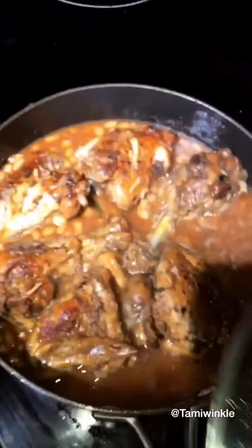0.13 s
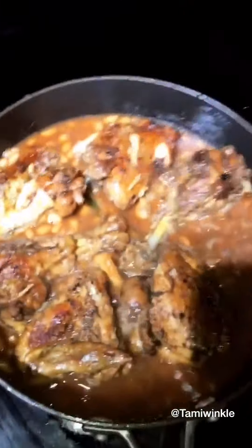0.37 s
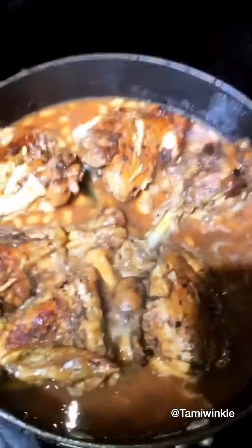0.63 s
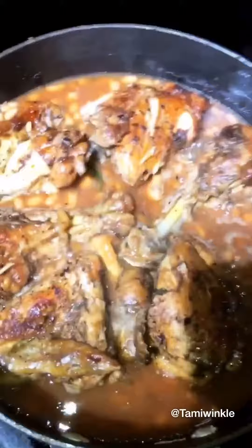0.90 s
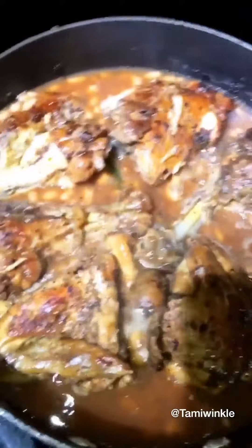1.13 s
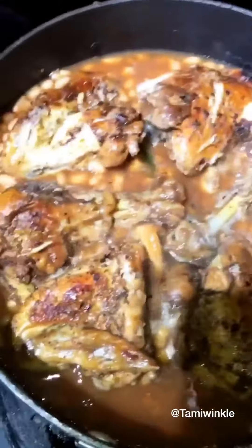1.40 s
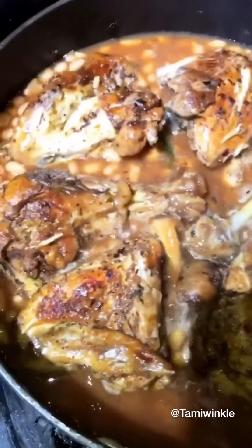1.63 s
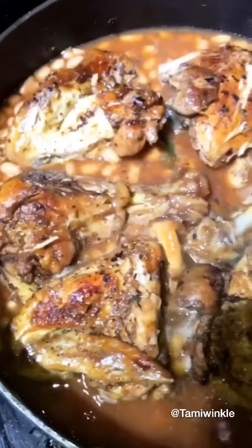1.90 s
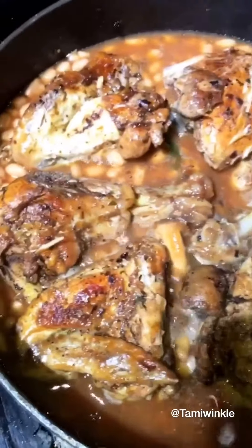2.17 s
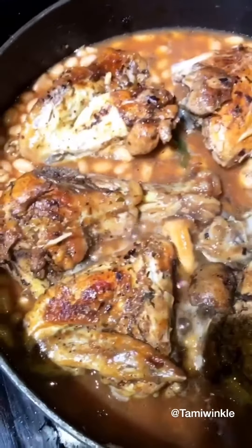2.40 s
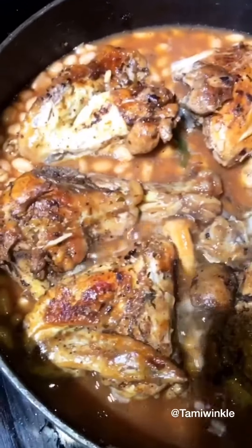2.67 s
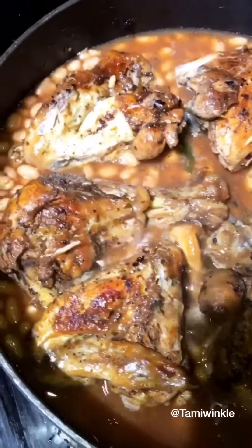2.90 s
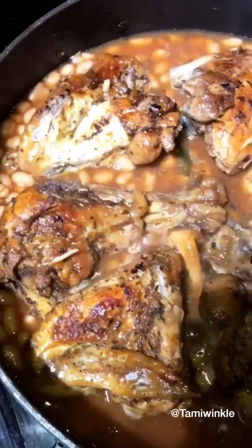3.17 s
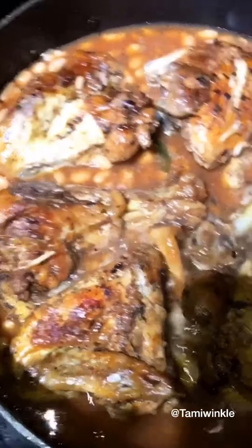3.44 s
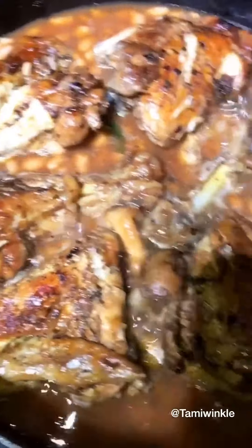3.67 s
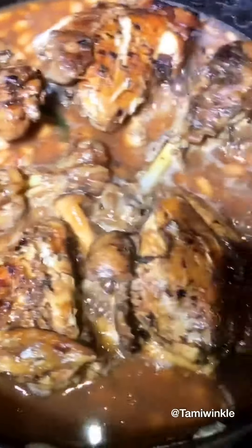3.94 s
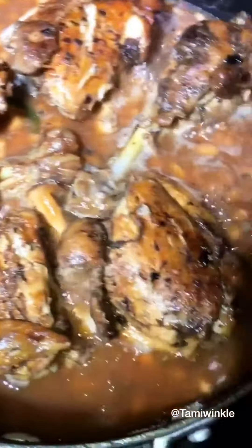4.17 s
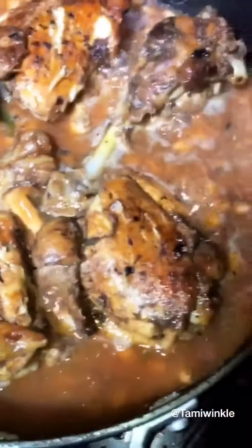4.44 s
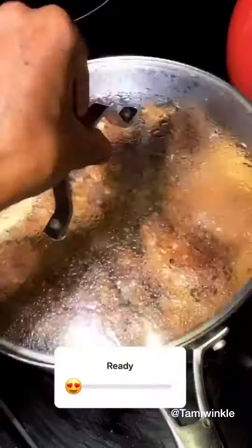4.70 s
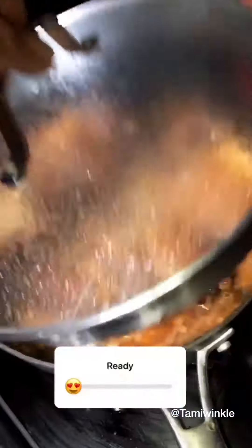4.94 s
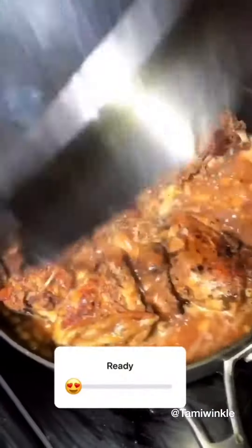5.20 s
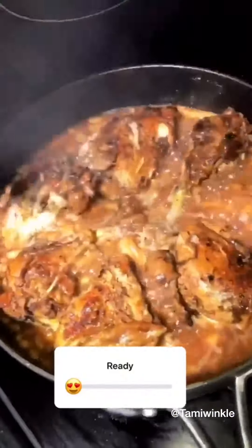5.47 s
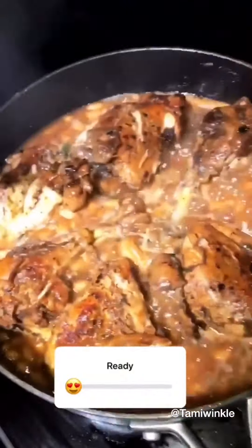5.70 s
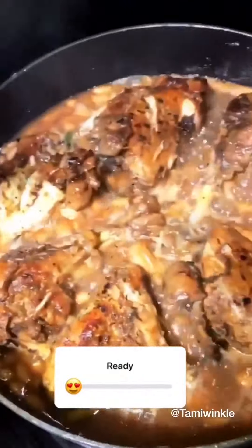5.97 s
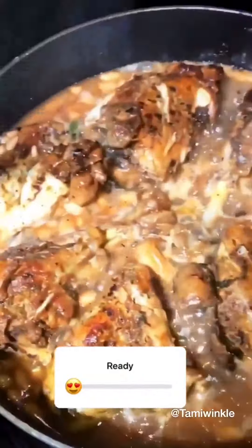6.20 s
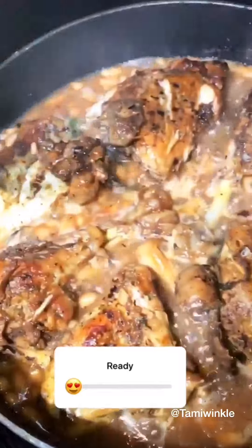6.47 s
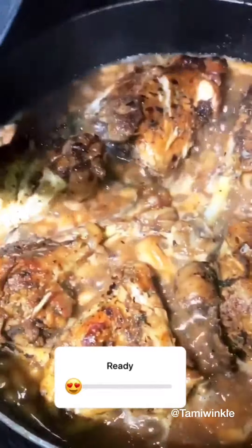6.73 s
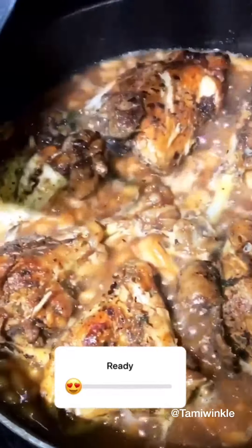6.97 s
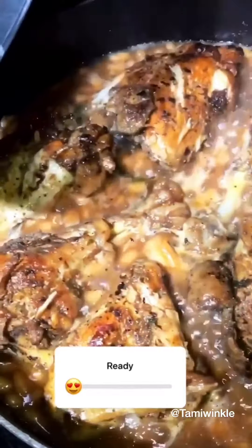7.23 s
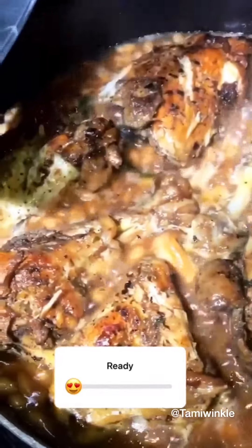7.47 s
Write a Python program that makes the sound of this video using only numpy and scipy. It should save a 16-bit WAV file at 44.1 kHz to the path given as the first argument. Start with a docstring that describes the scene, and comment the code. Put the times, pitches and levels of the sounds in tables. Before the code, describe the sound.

Thick sauce around chicken pieces simmers in a steel skillet, close to the microphone in a small, slightly reverberant kitchen. From 0 s, steam bubbles burst irregularly with hollow mid-pitched plops, smaller wet snaps and gurgles, over a fine soft fizz, crackle and low room rumble. At 0.96 s a lid lands nearby with two or three firm, damped knocks, then bounces and chatters along the counter in lighter clacks until about 1.45 s. Bubbling resumes prominence and thickens from 2.6 s, busiest and loudest between 3.3 and 4.5 s. Deep soft thumps fall near 3.0, 3.3 and 4.4 s. At 4.57 s all sound stops abruptly for about a tenth of a second. At 4.69 s it returns as the lid leaves the rim with faint touches, a slight ring at 4.77 s and a little hiss. Moderate plopping and brighter fizz continue, with another low thump at 7.2 s, until about 7.6 s.

```python
"""Thick sauce simmers in a steel skillet, close to the microphone: steam bubbles burst with hollow plops
and wet snaps over a fine fizz, with the kitchen's low rumble behind. About 1 s in, a lid is set down
nearby, bounces and slides. A few deep soft thumps come later. At 4.57 s the sound breaks off briefly; it
returns as the lid leaves the rim with a faint ring, and the simmering goes on. Bubbles and thumps are
short swelling sines, the lid is decaying modes with noise, and fizz and room tone are coloured noise."""
import sys
import numpy as np
from scipy import signal
from scipy.fft import rfft, irfft, next_fast_len
from scipy.io import wavfile
from scipy.ndimage import uniform_filter1d, map_coordinates

SR = 44100
rng = np.random.default_rng(int(sys.argv[2]) if len(sys.argv) > 2 else 0)


def waveform_to_disk(signal):
    """Save audio, clipped to [-1, 1], as 16-bit WAV at the path in sys.argv[1]."""
    frames = np.transpose(np.atleast_2d(signal))
    scaled = np.clip(frames, -1, 1) * 32767
    samples = np.round(scaled).astype(np.int16)
    wavfile.write(sys.argv[1], SR, samples)


def invert_db(x):
    """Field ratio 10**(x/20) for x, a level in decibels (scalar or array-like)."""
    u = np.asarray(x, float) / 20
    return 10 ** u


N = 335601

# Levels in the tables are relative: the functions add their own trims.
# large bubbles bursting, loud and soft: t/s, level/dB, f/Hz
PLOPS = [(0.012, -34, 696), (0.102, -34, 640), (0.116, -31, 720), (0.205, -26, 637), (0.288, -29, 624),
         (0.362, -40, 607), (0.385, -35, 623), (0.491, -36.5, 660), (0.527, -29.5, 635), (0.645, -23, 685),
         (0.656, -24.5, 866), (0.763, -35, 680), (0.817, -31, 690), (0.95, -34.5, 680), (1.545, -32.5, 645),
         (1.675, -27.5, 640), (1.828, -26, 710), (1.934, -29.5, 646), (2.024, -32.5, 700),
         (2.116, -28, 667), (2.244, -27, 647), (2.44, -29, 685), (2.623, -29, 680), (2.648, -25.5, 690),
         (2.763, -30, 646), (2.961, -30, 670), (2.993, -26, 693), (3.045, -28, 680), (3.093, -27, 690),
         (3.32, -25, 670), (3.333, -30, 700), (3.345, -26.5, 650), (3.36, -24.5, 650), (3.408, -24, 630),
         (3.429, -31, 705), (3.543, -28.5, 670), (3.554, -23.5, 630), (3.689, -23, 637),
         (3.739, -31.5, 640), (3.771, -25.5, 635), (3.783, -25.5, 630), (3.897, -31, 695),
         (3.915, -20.5, 681), (3.995, -24, 690), (4.1, -30.5, 656), (4.141, -30, 650), (4.223, -22, 646),
         (4.244, -28, 690), (4.267, -24, 680), (4.358, -29, 663), (4.371, -23.5, 706), (4.401, -27, 683),
         (4.495, -27.5, 665), (4.724, -31.5, 660), (4.786, -32, 664), (4.873, -30.5, 674),
         (4.924, -31.5, 674), (5.05, -22.5, 644), (5.148, -28.5, 644), (5.285, -32.5, 666),
         (5.579, -30.5, 680), (5.601, -31, 660), (5.624, -30, 600), (5.729, -31, 694), (5.845, -32, 640),
         (5.899, -31, 690), (5.976, -29, 640), (6.097, -27, 690), (6.165, -32.5, 626), (6.225, -25.5, 640),
         (6.342, -26, 643), (6.615, -29, 617), (6.823, -29.5, 695), (6.852, -27, 650), (7.011, -26.5, 676),
         (7.092, -24.5, 646), (7.157, -28.5, 680), (7.336, -28, 604), (7.398, -30.5, 630),
         (7.443, -31.5, 640), (7.522, -34, 720), (7.594, -30, 627)]
# smaller bubbles snapping open, loud and soft: t/s, level/dB, f/Hz
SNAPS = [(0.016, -35, 1490), (0.115, -36, 1090), (0.207, -36.5, 1330), (0.291, -33, 1400),
         (0.51, -39.5, 1510), (0.56, -42, 1430), (0.645, -43, 1000), (0.805, -32.5, 1280),
         (0.84, -36.5, 1320), (1.816, -34, 1300), (1.849, -30.5, 2130), (2.228, -31, 1850),
         (2.649, -31.5, 1580), (2.797, -33, 1550), (2.861, -31, 1180), (2.909, -32, 1450),
         (2.941, -28, 1400), (2.97, -26.5, 1370), (2.991, -30.5, 1330), (3.133, -30, 1120),
         (3.319, -30, 1560), (3.409, -28.5, 1120), (3.441, -26.5, 1150), (3.474, -29.5, 1370),
         (3.545, -36, 1340), (3.737, -35, 1290), (3.767, -26.5, 1350), (3.892, -33.5, 1410),
         (3.915, -32, 1160), (4.056, -33.5, 2020), (4.219, -41, 1420), (4.268, -24, 1360),
         (4.411, -31.5, 1420), (5.047, -35.5, 1120), (5.152, -36, 1510), (5.608, -35, 1650),
         (5.809, -31, 1640), (5.973, -33.5, 1400), (6.107, -34, 1060), (6.355, -35.5, 2050),
         (6.614, -31.5, 2600), (6.851, -31.5, 1450), (7.002, -35, 1770), (7.011, -32, 1520),
         (7.14, -32, 1640), (7.441, -38, 1550), (7.493, -33, 1940)]
# further random plops, then snaps: mean level/dB, level spread/dB, f/Hz, pitch spread (natural log of f)
MORE_PLOPS = (-33.5, 0, 662, 0.13)
MORE_SNAPS = (-36.5, 5, 1404, 0.85)
# droplets flashing to steam: t/s, level/dB
SPITS = [(0.206, -50.5), (0.813, -52), (1.527, -53), (1.553, -57), (1.786, -56), (2.116, -47), (2.724, -55),
         (2.789, -46), (3.325, -53), (3.53, -52.5), (3.69, -54), (4.068, -55), (4.366, -53.5),
         (5.035, -52.5), (5.574, -47), (5.86, -50), (6.48, -55), (6.628, -51), (6.961, -55), (7.375, -59)]
# wet splash noise: f/Hz, level/dB per Hz
SPLASH = [(500, -43.0), (900, 16), (1600, 1.0), (2600, -4.5), (4300, -13.5), (9000, -35)]
# lid meeting the counter: t/s, level/dB, thud level/dB and bright edge level/dB against it,
# favoured thud f/Hz, favoured ring f/Hz
KNOCKS = [(.963, 2, 2, -24.5, 560, 2600), (1.0109, 1.5, -0.5, -14.5, 260, 2400),
          (1.059, -3, 2, -29, 540, 1100), (1.084, -9, 6, -25.5, 520, 1200),
          (1.177, -8.5, 3.5, -34.5, 500, 1300), (1.193, -7.5, -3, -30, 500, 1700),
          (1.2258, -23.5, 7, -18.5, 480, 2600), (1.241, -17.5, 14, -15, 450, 1900),
          (1.248, -20.5, 17, -16, 450, 1200), (1.2913, -14, 13.5, -19.5, 390, 1900),
          (1.3128, -20.5, 8, -36.5, 350, 2000), (1.335, -10, -7, -19.5, 400, 1700),
          (1.363, -21, 12.5, -25.5, 480, 3200), (1.3823, -10, 1, -16, 428, 3600),
          (1.405, -12, 7.5, -17.5, 435, 2000), (1.416, -29, 14, -22, 430, 3200)]
# lid chattering along the counter: t/s, scrape level/dB, bright edge level/dB against it
SLIDE = [(1.175, -47, -6.5), (1.2, -31.5, -35.5), (1.225, -28, -25.5), (1.25, -16, -18.5),
         (1.28, -33, -17.5), (1.31, -22.5, -22.5), (1.36, -39.5, -30.5), (1.39, -24, -11),
         (1.44, -40.5, -19), (1.49, -52, -12)]
# modes of the lid damped by the counter: f/Hz, level/dB, t60/s
COUNTER_LID_MODES = [(181, -5.5, 0.12), (330, -8.5, 0.27), (434, 0.5, 0.057), (560, 2, 0.037),
                     (680, -12, 0.05), (894, -13, 0.1), (1060, -5.5, 0.03), (1400, -11.5, 0.039),
                     (1656, -3, 0.018), (1862, -9.5, 0.094), (2093, -7, 0.021), (2312, -7, 0.032),
                     (2683, -10, 0.059), (3045, -11.5, 0.041), (3200, -7, 0.027), (3735, -11, 0.022),
                     (4110, -16, 0.057), (5770, -33, .03), (6200, -22, .03), (6570, -20.5, 0.049),
                     (7710, -32.5, .03)]
# lid touching the rim: t/s, level/dB, hiss level/dB and ring level/dB against it, freedom to ring (0-1)
RIM_TOUCHES = [(4.688, -27, -9, -4, 0.35), (4.7674, -30, -10, 3.5, 1), (4.918, -29, -35, -7, 0.11)]
# modes of the free lid: f/Hz, level/dB, t60/s at full freedom
FREE_LID_MODES = [(1141, 0, .6), (1560, -3, .2), (2218, -2, .48), (2519, -9, .25), (3311, -2, .06),
                  (4264, 2, .07), (6300, -1, .06)]
# noise in the body of a blow: f/Hz, level/dB per Hz
CLACK = [(300, -17.5), (900, -3), (2000, -0.5), (3200, -5), (4300, -9.5), (9000, -58)]
# noise in its bright edge: f/Hz, level/dB per Hz
EDGE = [(3500, -24.5), (5000, -5), (6600, -1), (9000, -9.5), (10500, -17), (14000, -17)]
# resonances of the air in the pan: f/Hz, width/Hz, level/dB
PAN_AIR = [(330, 61, 8), (679, 150, 7.5), (1080, 160, -11.5), (1600, 89, 0), (2440, 270, -2.5),
           (3270, 500, -21.5)]
# main body of the fizz: f/Hz, level/dB per Hz
FIZZ = [(1470, -24.5), (2500, -1.5), (3220, -9.5), (4130, -8.5), (4840, -12.5), (6620, -10), (7820, -14.5),
        (12500, -16.5), (13400, -26), (14200, -43)]
# top of the fizz: f/Hz, level/dB per Hz
TREBLE = [(6000, -36.5), (8500, 3.5), (11000, -3), (14200, 3.5), (15000, -40)]
# course of the floor: t/s, fizz level/dB, its treble level/dB against that, rumble level/dB
FLOOR = [(0, -56.5, -6.5, -46.5), (.4, -59, -11, -47.5), (.8, -58.5, -15, -41), (1.2, -57, -15, -45),
         (2, -57.5, -9.5, -45.5), (2.8, -57, -17.5, -46), (3.3, -57.5, -16.5, -41), (3.6, -58, -13, -44),
         (4.4, -57, -13.5, -42.5), (5, -55, -7.5, -47), (5.4, -58, -8.5, -46), (5.65, -56, -8.5, -42.5),
         (6.3, -58.5, -13, -47), (6.7, -57, -8, -43.5), (7, -55, -8.5, -47), (7.2, -55.5, -4.5, -40),
         (7.6, -55.5, -6, -51)]
# deep soft thumps, as from the microphone or pan being handled: t/s, level/dB, f/Hz
THUMPS = [(3.036, -29, 34.4), (3.339, -34.5, 40.6), (4.419, -31, 70.4), (7.23, -28, 34.3)]
# murmur of the kitchen: f/Hz, level/dB per Hz
MURMUR = [(59, -18), (100, -2.5), (166, 3.5), (211, -2.5), (352, 6.5), (500, -14), (605, -1), (698, -8),
          (859, -11.5), (1550, -12.5), (2230, -18.5), (2420, -22.5), (4500, -30.5), (5850, -83.5),
          (9900, -120)]
# rumble of the kitchen: f/Hz, level/dB per Hz
RUMBLE = [(11, -23.5), (18, -7), (43, 0), (97, -9), (167, -10), (200, -22), (260, -47.5), (440, -120)]
# decay of the room: f/Hz, t60/s
ROOM_DECAY = [(200, 0.1), (2000, 0.17), (10000, 0.12)]
# the silence: start t/s, end t/s
BREAK = (4.569, 4.688)


def bursting():
    """Steam cavities ring as hollow plops and sharper snaps, with gurgle, wet splash and spits of steam."""
    plops = with_more(PLOPS, MORE_PLOPS, count=66)
    snaps = with_more(SNAPS, MORE_SNAPS, count=40)
    out = big_bubbles(plops, swell=2.18, cycles=2.3, glide=0.0036)
    out += big_bubbles(snaps, swell=0.84, cycles=3.3, glide=0.013)
    return out + gurgle(plops, snaps) + splash(plops, snaps) + spits()


def with_more(rows, kind, count):
    """Listed bursts plus random ones clumped around the listed plops."""
    mean_db, spread_db, hz, spread = kind
    lag, size, pitch = rng.standard_normal((count, 3)).T
    s = rng.choice(np.transpose(PLOPS)[0], count) + 0.04 * lag  # clump spread in s
    s = np.clip(s, .01, N / SR - .01)
    more = np.transpose([s, mean_db + spread_db * size, hz * np.exp(spread * pitch)])
    return np.vstack([rows, more])


def big_bubbles(rows, swell, cycles, glide):
    """One ringing cavity for each burst."""
    s, db, hz = np.transpose(rows)
    return grains(s, hz, invert_db(db), swell, cycles, glide, size=1200)


def gurgle(plops, snaps):
    """Seven bubbles swarm around each snap; each plop's cavity closes with a blurp and heaves the sauce."""
    s, db, hz = snaps.T
    lag, pitch, big = np.moveaxis(rng.standard_normal((len(s), 7, 3)), 2, 0)
    swarm_s = np.clip(s[:, None] + .008 + .014 * lag, 0, N / SR)
    swarm_hz = hz[:, None] * np.exp(.2 * pitch)
    swarm_gain = invert_db(db[:, None] - 9.0 + 1.53 * big)
    swarm = grains(swarm_s.ravel(), swarm_hz.ravel(), swarm_gain.ravel(),
                   swell=1.45, cycles=3.26, glide=0.0062, size=1000)
    s, db, hz = plops.T
    lag, pitch = rng.standard_normal((len(s), 2)).T
    blurp_s = np.minimum(s, N / SR - .03) + 0.00688 + 0.00307 * lag
    blurp_hz = hz * np.exp(0.11 + .15 * pitch)  # higher on average
    blurp = grains(blurp_s, blurp_hz, invert_db(db - 7.5), swell=1.3, cycles=2.95, glide=0.0061, size=1200)
    heave_hz = hz * .45 * np.exp(.2 * lag)
    heave = grains(s, heave_hz, invert_db(db - 11.5), swell=1.0, cycles=1.3, glide=.01, size=1200)
    return swarm + blurp + heave


def splash(plops, snaps):
    """Wet noise jumps up at each snap and just ahead of each plop, then dies away."""
    s, db, _ = snaps.T
    envelope = bursts(s, db - 10.0, t60=0.053)
    s, db, _ = plops.T
    envelope += bursts(s - .003, db - 16, t60=0.039)
    return envelope * rush(SPLASH, patchy_db=4.5)


def spits():
    """Droplets flash to steam in short puffs of fizz."""
    s, db = np.transpose(SPITS)
    return bursts(s, db + 4.5, t60=0.047) * rush(FIZZ, patchy_db=0.1)


def lid_down():
    """Blows and a chattering slide ring the lid; low modes thud, high ones give the bright edge."""
    bands = [(0, 800), (800, 4600), (4600, SR)]  # Hz
    low, mid, high = ([m for m in COUNTER_LID_MODES if a <= m[0] < b] for a, b in bands)
    lid = lid_knocks(low, mid, high) + lid_slide(low, mid, high)
    return filtered(lid, lambda hz: (1j * hz / (90 + 1j * hz)) ** 2)  # low cut


def lid_knocks(low, mid, high):
    """Each blow excites most the modes its point of contact favours, with a clack of noise."""
    out, t = np.zeros(N + SR), np.arange(SR // 4) / SR
    onset = 1 - np.exp(-t / 0.00027)
    for s, db, thud_db, edge_db, thud_hz, ring_hz in KNOCKS:
        blow = ring(favour(mid, ring_hz), t)
        blow += invert_db(thud_db - 8.0) * ring(favour(low, thud_hz), t)
        blow += invert_db(edge_db - 22) * ring(high, t)
        out[round(s * SR):][:len(t)] += invert_db(db + 2.5) * blow * onset
    s, db, _, edge_db, *_ = np.transpose(KNOCKS)
    clack = bursts(s, db - 17, t60=.05) * rush(CLACK, patchy_db=1)
    clack += bursts(s, db + edge_db - 8, t60=.07) * rush(EDGE, patchy_db=2)
    return out[:N] + clack


def lid_slide(low, mid, high):
    """Tiny irregular contacts over steady rubbing drive the modes of the lid."""
    scrape_db, edge_db = curves(SLIDE, outside=-120)
    chatter = rng.standard_normal(N) * (.08 + (rng.random(N) < .006))

    def rub(modes, width_hz):
        """The chatter heard through modes of one width, rms 1."""
        return unit(filtered(chatter, resonances([(hz, width_hz, db) for hz, db, _ in modes])))

    body = rub(mid, width_hz=150) + rub(favour(low, 440), width_hz=80)
    edge = rub(high, width_hz=740) + rush(EDGE, patchy_db=3)
    return invert_db(scrape_db) * (body + invert_db(edge_db) * edge)


def lid_lift():
    """The lid grazes the rim and rings as far as the contact lets it; trapped steam hisses out."""
    out, t = np.zeros(N + SR), np.arange(SR // 2) / SR
    onset = 1 - np.exp(-t / 0.0014)
    for s, db, _, ring_db, free in RIM_TOUCHES:
        modes = [(hz, level, t60 * np.clip(free, .05, 1)) for hz, level, t60 in FREE_LID_MODES]
        out[round(s * SR):][:len(t)] += invert_db(db + ring_db) * ring(modes, t) * onset
    s, db, hiss_db, *_ = np.transpose(RIM_TOUCHES)
    hiss = bursts(s, db + hiss_db - 3, t60=0.11) * rush(EDGE, patchy_db=3)
    graze = bursts(s, db - 14, t60=0.11) * rush(CLACK, patchy_db=2)
    return out[:N] + hiss + graze


def ring(modes, t):
    """One blow: every mode decays from a new random strength; the sum is scaled to peak 1."""
    wave = np.zeros(len(t))
    for hz, db, t60 in modes:
        wave += invert_db(db + rng.normal(0, 2) - 60 * t / t60) * np.sin(2 * np.pi * hz * t)
    return wave / np.abs(wave).max()


def favour(modes, centre_hz):
    """Modes far from the centre are excited less, by 12 dB per octave."""
    return [(hz, db - 12 * abs(np.log2(hz / centre_hz)), t60) for hz, db, t60 in modes]


def simmer():
    """Countless small bubbles ring the air in the pan; droplets crackle finely on the hot wall."""
    boil_db, (fizz_db, treble_db, _) = boil(), curves(FLOOR)
    place, pitch, big = rng.random((3, 3000))
    hz = 300 * (3400 / 300) ** pitch
    gain = invert_db(boil_db[(place * N).astype(int)] - 2 * np.log(1 - big))  # rare larger ones
    small = grains(place * N / SR, hz, gain, swell=0.6, cycles=1.56, glide=0.044, size=600)
    small = invert_db(2.5) * filtered(small, resonances(PAN_AIR))
    fizz = rush(FIZZ, patchy_db=2.1) + invert_db(treble_db) * rush(TREBLE, patchy_db=2.1)
    place, big = rng.random((2, 700))
    crackle = bursts(place * N / SR, -11 - 3 * np.log(1 - big), t60=0.033)
    return small + invert_db(fizz_db + 0.5 + 1.4 * wobble(13)) * (0.69 + crackle) * fizz


def boil():
    """Strength of the small bubbling in dB: it follows the density of the listed plops and snaps."""
    s, db, _ = np.transpose(PLOPS + SNAPS)
    hits = np.bincount(np.round(s * SR).astype(int), invert_db(db), N)[:N]
    span_s = 0.45  # Gaussian smoothing, half-width at 1/e
    busy = np.abs(filtered(hits, lambda hz: np.exp(-(np.pi * hz * span_s) ** 2)))
    return -54 + 0.17 * 20 * np.log10(busy / busy.mean() + 0.14)


def thumps():
    """Deep soft thumps, as from the microphone or pan being handled: very short low sines."""
    s, db, hz = np.transpose(THUMPS)
    return grains(s, hz, invert_db(db), swell=1.0, cycles=1.8, glide=0.0091, size=16000)


def kitchen():
    """The steady murmur of the room and a low rumble, both coloured noise."""
    rumble_db = curves(FLOOR)[2] + 0.53 * wobble(4.45)
    murmur = invert_db(-43.0 + 0.67 * wobble(3.16)) * rush(MURMUR, patchy_db=2.0)
    return murmur + invert_db(rumble_db + 2.5) * rush(RUMBLE, patchy_db=.5)


def room(x):
    """Each frequency of the kitchen's answer dies at its own speed."""
    hz, t, z = signal.stft(rng.standard_normal(SR // 2), SR, nperseg=256)
    decay = invert_db(-60 * t / along(ROOM_DECAY, hz)[:, None])
    tail = signal.istft(z * decay, SR, nperseg=256)[1]
    delayed = np.pad(x, (200, 0))  # samples
    return signal.fftconvolve(delayed, tail / np.linalg.norm(tail))[:N]


def grains(s, hz, gain, swell, cycles, glide, size):
    """Short sines that swell over some cycles to a peak at s, rise in pitch and die over some more."""
    turns = hz[:, None] * (np.arange(size) - size // 2) / SR
    shape = np.exp(-np.where(turns < 0, (turns / swell) ** 2, (turns / cycles) ** 1.3))
    wave = gain[:, None] * shape * np.sin(2 * np.pi * turns * (1 + glide * turns))
    at = np.round(s * SR).astype(int)[:, None] + np.arange(size)
    return np.bincount(at.ravel(), wave.ravel(), N + size)[size // 2:][:N]


def bursts(s, db, t60):
    """An envelope that jumps at each time and dies away."""
    hits = np.bincount(np.round(s * SR).astype(int), invert_db(db), N)[:N]
    return signal.fftconvolve(hits, invert_db(-60 * np.arange(SR // 8) / SR / t60))[:N]


def rush(spectrum, patchy_db):
    """Coloured noise of rms 1 with patches of random gain."""
    z = signal.stft(rng.standard_normal(N + 512), nperseg=512)[2]
    field = uniform_filter1d(rng.standard_normal(z.shape), size=6, axis=0)
    field = uniform_filter1d(field, size=8, axis=1)
    noise = signal.istft(z * invert_db(patchy_db * unit(field)), nperseg=512)[1][:N]
    return unit(filtered(noise, lambda hz: invert_db(along(spectrum, hz))))


def resonances(table):
    """Causal response of (f/Hz, width/Hz, level/dB) resonances, alternating in sign."""
    def response(f):
        total = 0
        for k, (centre, width, db) in enumerate(table):
            peak = 1j * f * width / (centre * centre - f * f + 1j * f * width)
            total = total + (-1) ** k * invert_db(db) * peak
        return total
    return response


def filtered(x, response):
    """x times a complex response of frequency."""
    m = next_fast_len(N + SR // 2)
    return irfft(rfft(x, m) * response(np.fft.rfftfreq(m, 1 / SR)), m)[:N]


def wobble(rate):
    """A smooth random curve, rate knots a second."""
    return map_coordinates(rng.standard_normal(int(N * rate / SR) + 4), [np.arange(N) * rate / SR])


def curves(rows, outside=None):
    """One value per sample for each column after the time."""
    s, *cols = np.transpose(rows)
    return [np.interp(np.arange(N) / SR, s, c, outside, outside) for c in cols]


def along(points, hz):
    """(f/Hz, value) points read on a log axis."""
    f, v = np.transpose(points)
    return np.interp(np.log(hz + 1), np.log(f + 1), v)


def unit(x):
    """Scaled to rms 1."""
    return x / np.sqrt(np.mean(x ** 2) + 1e-20)


def scene():
    """Near sources with a little room, over the simmer, the thumps and the kitchen floor."""
    bubbles = bursting()
    lid = lid_down() + lid_lift()
    reflections = room(invert_db(-7) * bubbles + invert_db(-8.5) * lid)
    return (bubbles + lid + reflections + simmer() + thumps() + kitchen())[None]


def roll_off(x):
    """The treble ends steeply here."""
    return signal.sosfilt(signal.butter(12, 14600, fs=SR, output="sos"), x)


def record(dry):
    """The loudest peaks saturate, the sound is cut out during the break, and the top is cut off."""
    t = np.arange(N) / SR
    soft = dry[0] / (1 + np.abs(dry[0] / .9) ** 4) ** (1 / 4)
    gate = np.clip(np.maximum(BREAK[0] - t, t - BREAK[1]) / 0.0018, 0, 1)  # 1.8 ms ramps
    mix = filtered(soft * gate, lambda hz: hz < 14150)[None]
    return roll_off(mix)


dry = scene()
out = record(dry)
waveform_to_disk(out)
```